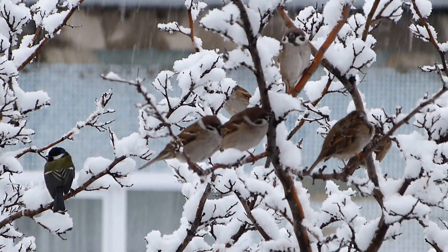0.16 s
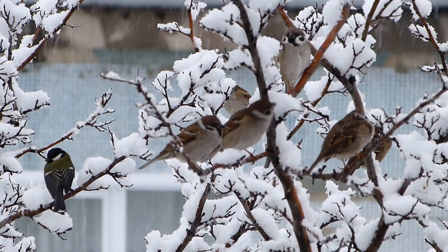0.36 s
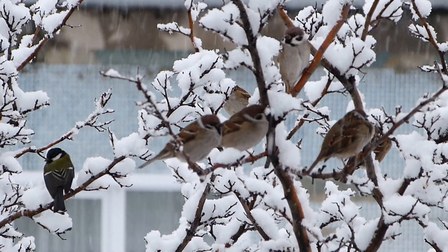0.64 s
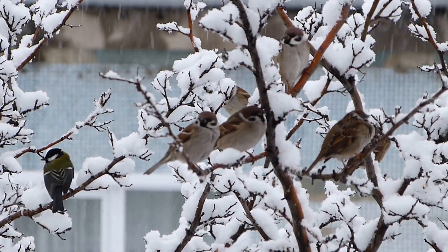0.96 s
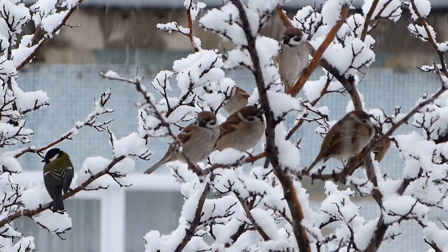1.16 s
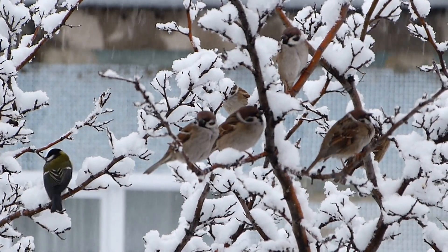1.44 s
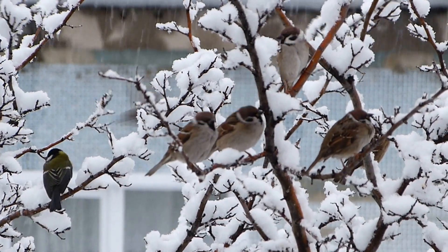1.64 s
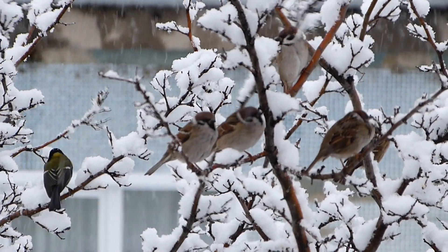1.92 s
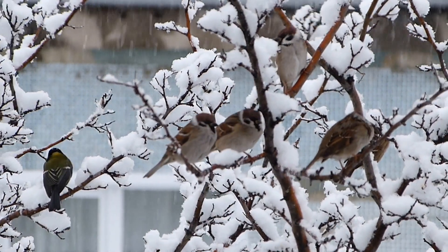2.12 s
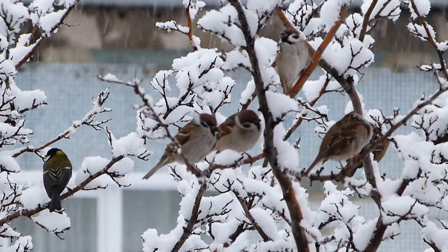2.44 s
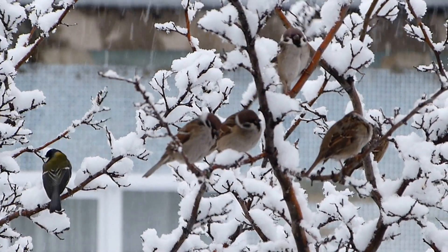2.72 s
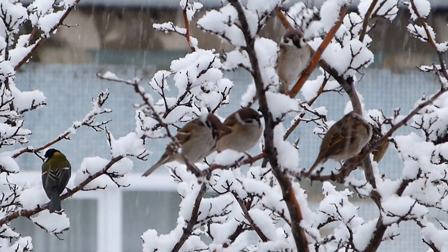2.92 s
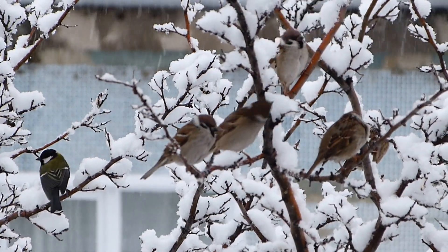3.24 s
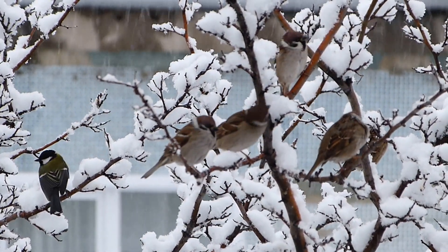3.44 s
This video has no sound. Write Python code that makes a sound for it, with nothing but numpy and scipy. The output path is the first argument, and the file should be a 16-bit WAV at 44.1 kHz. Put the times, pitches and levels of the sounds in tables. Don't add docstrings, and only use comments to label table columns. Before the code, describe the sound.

Small birds chirping in quick whistled notes, with twig ticks, wing rustles and faraway dog barks.

```python
import sys
import numpy as np
from scipy import signal
from scipy.fft import rfft, irfft
from scipy.io import wavfile
from scipy.ndimage import uniform_filter1d

SR = 44100
rng = np.random.default_rng(int(sys.argv[2]) if len(sys.argv) > 2 else 0)


def output_pcm(signal):
    pcm = np.clip(np.atleast_2d(signal).T, -1, 1) * 32767
    wavfile.write(sys.argv[1], SR, np.round(pcm).astype(np.int16))


def gain_from_db(level_db):
    decades = np.asarray(level_db, float) / 20
    return 10 ** decades


N = 157878
LEFT_RIGHT = np.array([[1], [-1]])


def rms_one(x):
    return x / np.sqrt(np.mean(x ** 2) + 1e-20)


def drift(rate_hz):
    r = np.exp(-2 * np.pi * rate_hz / SR)
    settle = 9000
    wander = signal.lfilter([1], [1, -2 * r, r * r], rng.standard_normal(N + settle))
    return rms_one(wander[settle:])


def band(x, order, low_hz, high_hz):
    return signal.sosfilt(signal.butter(order, [low_hz, high_hz], "band", fs=SR, output="sos"), x)


def low_pass(x, order, cut_hz):
    return signal.sosfilt(signal.butter(order, cut_hz, fs=SR, output="sos"), x)


def soft_ends(t, length, edge):
    return np.sin(np.pi / 2 * np.clip(np.minimum(t, length - t) / edge, 0, 1)) ** 2


def add_call(out, start, length, pitch, level_db, overtones_db, rough, flutter, edge=0.0018, wobble=0):
    i = max(int(start * SR), 0)
    t = np.arange(min(int(length * SR), N - i)) / SR
    here = slice(i, i + len(t))
    hz = pitch(t) * (1 + wobble * flutter[::-1][here])
    phase = 2 * np.pi * np.cumsum(hz) / SR
    effort_db = level_db - np.max(level_db)
    tone = np.sin(phase)
    for harmonic, db in enumerate(overtones_db, start=2):
        tone = tone + gain_from_db(db + effort_db) * np.sin(harmonic * phase)
    strength = np.sqrt(2) * gain_from_db(level_db) * soft_ends(t, length, edge)
    out[here] += strength * tone * (1 + rough * flutter[here])


def near_chirps(flutter):
    # (time [s], pitch [Hz], level [dB])
    chirps = [
        [(.738, 4150, -56.5), (.746, 6110, -50.5), (.757, 5780, -50.5), (.765, 4220, -58)],
        [(.768, 5690, -65), (.78, 5500, -45), (.79, 5750, -44.5), (.797, 4230, -69)],
        [(1.48, 2363, -60), (1.5, 3540, -55.5), (1.515, 4810, -53.5), (1.53, 4910, -55), (1.55, 4540, -62),
         (1.562, 4380, -50)],
        [(1.56, 5070, -45), (1.571, 5710, -45.5), (1.6, 6550, -49), (1.612, 6500, -59)],
        [(2.388, 4720, -48), (2.412, 4624, -51.5), (2.432, 4580, -56)],
        [(2.438, 3900, -54.5), (2.46, 4750, -54.5), (2.5, 5260, -53.5), (2.515, 5610, -59),
         (2.535, 5340, -60.5), (2.6, 5420, -69)],
        [(2.91, 3920, -55), (2.925, 4380, -61), (2.95, 4450, -61), (2.968, 4200, -52), (2.982, 3620, -59),
         (3.014, 3780, -54)],
    ]
    # (time [s], pitch [Hz], level [dB])
    outburst = [
        [(3.045, 2500, -51), (3.056, 3570, -60), (3.066, 4710, -50), (3.08, 4400, -52), (3.098, 4800, -45.5),
         (3.118, 5870, -45.5), (3.152, 5840, -46), (3.178, 4510, -53)],
        [(3.19, 4435, -47.5), (3.203, 5400, -40.5), (3.218, 4896, -39.5), (3.245, 4714, -47.5)],
        [(3.288, 3643, -58), (3.305, 4200, -41.5), (3.316, 4750, -40.5), (3.323, 3995, -36.5),
         (3.332, 3100, -47), (3.342, 2440, -55)],
        [(3.432, 4130, -57), (3.455, 4885, -42), (3.475, 5390, -47.5), (3.512, 5400, -55)],
    ]
    second_harmonics_db = [-24, -28, -24, -36, -39, -30, -30, -26, -31, -24, -34]
    shake, wobble, third_db = 0.39, 0.0098, -2
    out = np.zeros(N)
    for call, second_db in zip(chirps + outburst, second_harmonics_db):
        s, hz, db = np.transpose(call)
        length = s[-1] - s[0]
        t = s[0] + np.arange(int(length * SR)) / SR

        def pitch(u):
            return uniform_filter1d(np.interp(u + s[0], s, hz), size=130, mode="nearest")

        overtones_db = [second_db, second_db + third_db]
        add_call(out, s[0], length, pitch, np.interp(t, s, db), overtones_db, shake, flutter, wobble=wobble)
    return out


def dips(flutter):
    # (start [s], length [s], level [dB], pitch at the ends [Hz], lowest pitch [Hz])
    dip_calls = [
        (1.462, 0.038, -57, 3100, 2233),
        (3.021, .028, -51, 3560, 2096),
        (3.201, .034, -53.5, 4400, 2400),
        (3.374, 0.039, -48.5, 7200, 2400),
    ]
    dip_overtones_db = [-6, -10]
    out = np.zeros(N)
    for s, length, db, end_hz, bottom_hz in dip_calls:

        def pitch(u):
            return bottom_hz * (end_hz / bottom_hz) ** ((2 * u / length - 1) ** 2)

        add_call(out, s, length, pitch, db, dip_overtones_db, .39, flutter, .006, .0098)
    return band(out, 2, 3100, 7500)


def far_whistles(flutter):
    # (start [s], length [s], level [dB], first pitch [Hz], last pitch [Hz])
    whistles = [(.001, 0.04, -63, 5000, 5090), (0.176, 0.09, -61.5, 4774, 4760),
                (0.479, 0.076, -64, 3665, 3480), (.585, 0.029, -67, 8000, 7930),
                (.586, 0.13, -70, 2870, 2893), (0.646, 0.054, -67, 3770, 3790),
                (0.792, 0.026, -54, 3530, 4760), (1.55, .03, -61, 3300, 2850),
                (1.972, 0.032, -67, 1664, 2420), (2.546, 0.0526, -66.5, 3270, 2790),
                (2.788, 0.04, -63.5, 3740, 3920), (2.825, 0.035, -59.5, 3500, 3275),
                (2.889, 0.03, -63.5, 6200, 7100), (3.23, 0.04, -57, 3540, 3860)]
    # (start [s], length [s], level [dB], first pitch [Hz], last pitch [Hz])
    strokes = [(.26, .06, -77, 5570, 5400), (0.269, 0.062, -70, 4220, 4120), (.35, 0.059, -65, 4960, 5110),
               (.38, .05, -71, 3670, 3640), (.5, 0.05, -67.5, 3000, 2730), (0.703, .016, -68, 8300, 8240),
               (.744, 0.024, -62, 3570, 3180), (.772, .022, -57, 3690, 3260),
               (.8, 0.039, -60.5, 5610, 5550), (.806, 0.014, -62, 2940, 2920),
               (1.684, 0.039, -52, 4870, 4690), (1.7, 0.072, -59, 4250, 3860),
               (1.748, 0.056, -56, 4730, 4760), (1.729, 0.044, -64.5, 3510, 3340),
               (1.775, 0.047, -61, 4090, 3900), (2.011, 0.025, -65, 3470, 4170),
               (2.042, .03, -63.5, 3600, 2820), (2.504, .02, -63.5, 2840, 2980),
               (2.941, 0.0099, -50.5, 4200, 5380), (2.9, 0.029, -63, 3310, 3730),
               (3.012, 0.016, -51, 6000, 4330), (3.022, .012, -59, 7360, 6300),
               (3.048, 0.048, -54.5, 3810, 3865), (3.098, .016, -54, 3650, 4330),
               (3.327, 0.017, -49.5, 7000, 6530), (3.332, 0.026, -62, 4500, 3620),
               (3.362, 0.016, -70, 4370, 3000), (2.66, 0.086, -72, 5500, 5600)]
    rough, edge_s = .65, .006
    out = np.zeros(N)
    for calls, wobble in ((whistles, .008), (strokes, .025)):
        for s, length, db, first, last in calls:

            def pitch(u):
                return first + (last - first) * u / length

            add_call(out, s, length, pitch, db, [], rough, flutter, edge_s, wobble)
    return out


def sparrows():
    flutter = drift(272)
    birds = near_chirps(flutter) + far_whistles(flutter) + dips(flutter)
    birds = low_pass(birds, 2, 21000)
    wall_s, wall_db = .009, -6.5
    return birds + gain_from_db(wall_db) * np.pad(birds, (int(wall_s * SR), 0))[:N]


def rustles():
    # (start [s], length [s], level [dB], low edge [Hz], high edge [Hz])
    swells = [(0.145, 0.068, -66.5, 6500, 11800), (0.237, 0.11, -66.5, 3870, 6000),
              (0.332, .09, -66.5, 3980, 8500), (0.483, 0.13, -63, 2200, 4050),
              (0.488, 0.047, -65.5, 4800, 8450), (0.684, 0.19, -62, 2900, 8300),
              (1.324, 0.14, -66, 5530, 8800), (1.665, 0.2, -60.5, 3320, 5970),
              (1.676, 0.093, -69, 6900, 11900), (1.949, .12, -62.5, 2454, 4940),
              (2.42, 0.24, -67, 2470, 3580), (2.78, 0.076, -62.5, 3470, 6400),
              (2.887, 0.21, -59, 3100, 5000), (3.091, 0.029, -58, 850, 1600),
              (3.314, 0.15, -55.5, 2900, 7850), (3.303, 0.078, -62.5, 8000, 11900),
              (3.46, 0.076, -66, 2090, 2880), (1.45, 0.098, -65, 3000, 8000),
              (3.108, 0.28, -58.5, 3320, 7000), (.001, 0.056, -66, 2800, 4180)]
    grain_db, side_share = 2.5, 0.5
    out = np.zeros((2, N))
    white = rng.standard_normal((2, N)) * gain_from_db(grain_db * drift(110))
    for s, length, db, low_hz, high_hz in swells:
        i = int(s * SR)
        t = np.arange(int(length * SR)) / SR
        here = slice(i, i + len(t))
        puff = rms_one(band(white[:, here], 3, low_hz, high_hz))
        out[:, here] += gain_from_db(db) * soft_ends(t, length, length / 3) * puff
    return out[0] + side_share * out[1] * LEFT_RIGHT


def ticks():
    # (time [s], peak level [dB], time to fade by 60 dB [s])
    snaps = [
        (.156, -56, .05),
        (.166, -57.5, 0.091),
        (1.014, -55, 0.076),
        (1.025, -51.5, 0.067),
        (1.3285, -52, 0.09),
        (1.468, -56, 0.9),
        (2.356, -38, 0.22),
        (2.368, -59, 0.083),
        (2.987, -55, 0.2),
    ]
    crack_s, tail_db = 0.00094, -8
    t, strength = np.arange(N) / SR, np.zeros(N)
    for s, db, decay in snaps:
        u = np.maximum(t - s, 0)
        crack = np.exp(-u / crack_s)
        sifting = gain_from_db(tail_db - 60 * u / max(decay, .005))
        strength += (t >= s) * gain_from_db(db) * (crack + sifting)
    noise = rng.standard_normal((2, N)) * [[1], [.5]]
    return rms_one(band(noise, 4, 3700, 9500)) * strength


def dogs():
    # (start [s], length [s], level [dB], pitch [Hz], second harmonic [dB])
    barks = [
        (1.468, 0.073, -48.5, 503.2, 1),
        (1.76, 0.077, -45, 506.1, -5),
        (2.155, 0.078, -51, 482.6, -2),
    ]
    # (start [s], length [s], level [dB], pitch [Hz], second harmonic [dB])
    yaps = [
        (1.452, 0.033, -51.5, 872, -22),
        (1.738, 0.048, -50, 809.6, -29),
        (1.79, 0.05, -51, 809, -21),
        (2.143, 0.035, -48.5, 854, -29),
    ]
    echo_s, rise, rise_s = .07, .16, .014
    rough, edge_share, wobble = .4, .35, .015
    out, flutter = np.zeros(N), drift(98)
    for calls, echo_db in ((barks, -9.5), (yaps, -0.5)):
        for s, length, db, hz, second_db in calls:

            def pitch(u):
                return hz * (1 - rise * np.exp(-u / rise_s))

            overtones_db = [second_db, second_db - 22]
            for lag, loss_db in ((0, 0), (echo_s, echo_db)):
                add_call(out, s + lag, length, pitch, db + loss_db, overtones_db, rough, flutter,
                         length * edge_share, wobble)
    return out


def thud():
    start_s, hz, fade_s, level_db = 3.095, 186.6, 0.49, -54.5
    u = np.maximum(np.arange(N) / SR - start_s, 0)
    return gain_from_db(level_db - 60 * u / fade_s) * np.sin(2 * np.pi * hz * u)


def yard_echoes(x, t60, gap, cut_hz):
    t = np.arange(SR) / SR
    h = rng.standard_normal((2, SR)) * gain_from_db(-60 * t / t60) * np.clip(t / gap - 1, 0, 1)
    h = low_pass(h, 1, cut_hz)
    h = h / np.sqrt(np.sum(h ** 2, 1, keepdims=True))
    return signal.fftconvolve(x[None], h, axes=1)[:, :N]


def two_ears(spectra, turn=1):
    # (frequency [Hz], left-right likeness [0-1], left ahead by [radians], left minus right [dB])
    likeness = [(60, .9, .2, -1.5), (200, .75, .7, -6), (500, .7, 1.7, -1.5), (1000, .5, 2.2, -.4),
                (2500, .45, .5, 0), (6000, .6, .1, -.3), (15000, .35, 0, .4)]
    table_hz, alike, lead, lean_db = np.transpose(likeness)
    log_hz = np.log(np.fft.rfftfreq(N, 1 / SR) + 1)
    alike, lead, lean_db = (np.interp(log_hz, np.log(table_hz), v) for v in (alike, lead, lean_db))
    alike = np.clip(alike, 0, 1)
    side = LEFT_RIGHT / 2
    shared = np.sqrt(alike) * spectra[0] * np.exp(1j * turn * lead * side)
    separate = np.sqrt(1 - alike) * spectra[1:]
    return irfft((shared + separate) * gain_from_db(lean_db * side), N)


def flock():
    level_db, patch_db = -74, 2.5
    white, patch_edges = rng.standard_normal((2, N)), np.geomspace(2705, 8000, num=6)
    out = np.zeros((2, N))
    for low_hz, high_hz in zip(patch_edges, patch_edges[1:]):
        out += gain_from_db(level_db + patch_db * drift(13.0)) * rms_one(band(white, 2, low_hz, high_hz))
    return out


def noise_shape(hz, table):
    table_hz, db = np.transpose(table)
    shape = gain_from_db(np.interp(np.log(hz), np.log(table_hz), db, left=-90, right=-90))
    return shape / np.sqrt(np.mean(shape ** 2))


def town():
    # (frequency [Hz], level per Hz [dB])
    hum_shape = [(15, -49), (25, -9.5), (32, -25.5), (232, -10.5), (327, -13), (575, -4.5), (838, -11.5),
                 (977, -10), (1500, -19), (1950, -35), (3300, -120)]
    # (frequency [Hz], level per Hz [dB])
    hiss_shape = [(880, -4.5), (1500, 1), (1990, -0.5), (3340, -6), (4400, -2), (4850, 0), (7820, -6),
                  (11700, -12), (15500, -17.5)]
    # (centre [Hz], width [Hz], level [dB])
    machines = [(177.5, 48, -65), (233.3, 2.2, -68.5), (495.4, 7.6, -69.5), (560.4, 14, -68)]
    hum_db, hiss_db = -58, -64
    hz = np.fft.rfftfreq(N, 1 / SR) + 1e-3
    white = rfft(rng.standard_normal((2, 3, N)))
    hum = gain_from_db(hum_db) * noise_shape(hz, hum_shape)
    hiss = gain_from_db(hiss_db) * noise_shape(hz, hiss_shape)
    drone_power = 0
    for centre, width, db in machines:
        peak = gain_from_db(2 * db) * SR / (np.pi * width)
        drone_power = drone_power + peak / (1 + (2 * (hz - centre) / width) ** 2)
    low = two_ears(white[0] * np.sqrt(hum ** 2 + drone_power * (hz > 90)))
    high = two_ears(white[1] * hiss)
    return low * gain_from_db(1.0 * drift(12.0)) + high * gain_from_db(0.92 * drift(27))


def scene():
    birds, (tick_mid, tick_side), barks = sparrows(), ticks(), dogs()
    ahead = birds + tick_mid
    echoes = gain_from_db(-11.5) * yard_echoes(ahead, 0.32, 0.0079, 10400)
    near = (ahead + echoes[0]) * gain_from_db(-.3 * LEFT_RIGHT)
    near = near + (tick_side + 0.46 * echoes[1]) * LEFT_RIGHT
    dog_echoes = gain_from_db(-13) * yard_echoes(barks, .6, 0.018, 820)
    far = two_ears(rfft(np.vstack([barks + thud(), dog_echoes])), turn=0.55)
    return near + gain_from_db(3) * far + town() + flock() + rustles()


def roll_off(x):
    return signal.sosfilt(signal.butter(12, 15660, fs=SR, output="sos"), x)


def record(dry):
    top_hz, busy_db, offset = 12500, -55, -.003
    spectrum, hz = rfft(dry), np.fft.rfftfreq(N, 1 / SR)
    top = irfft(spectrum * (hz > top_hz), N)
    calls = irfft(spectrum[0] * (hz > top_hz / 5) * (hz < top_hz), N)
    busy = uniform_filter1d(calls ** 2, size=2048) / gain_from_db(2 * busy_db)
    lost = top * busy ** 2 / (1 + busy ** 2)
    return roll_off(dry - lost + offset)


dry = scene()
out = record(dry)
output_pcm(out)
```